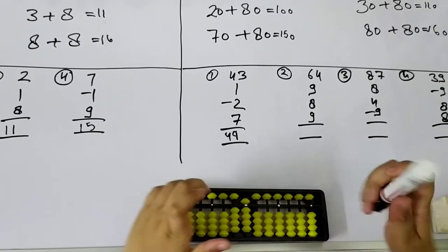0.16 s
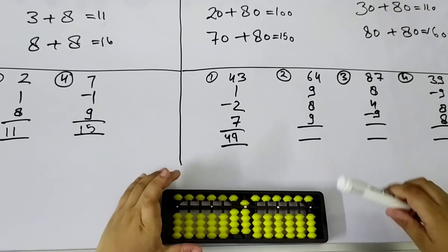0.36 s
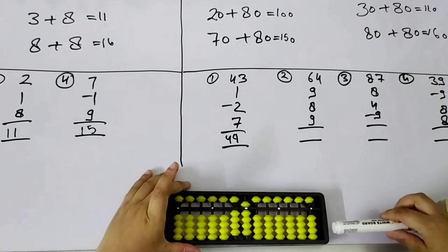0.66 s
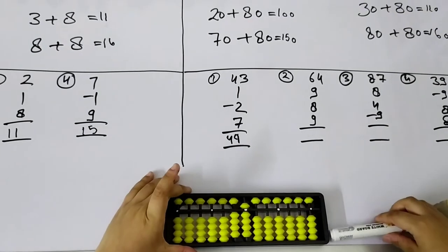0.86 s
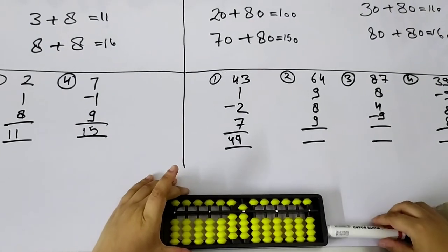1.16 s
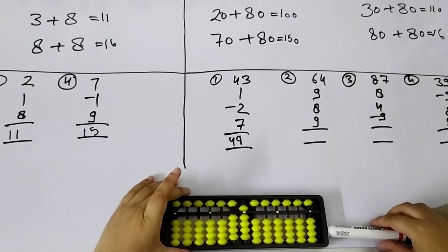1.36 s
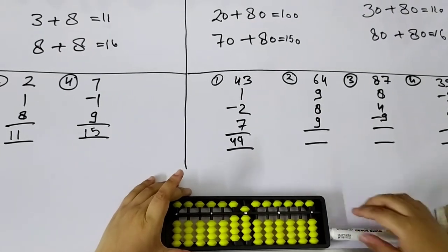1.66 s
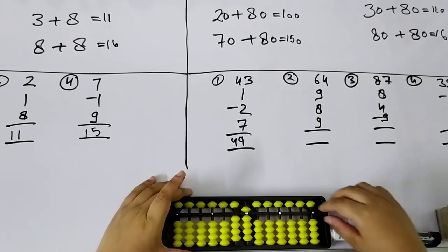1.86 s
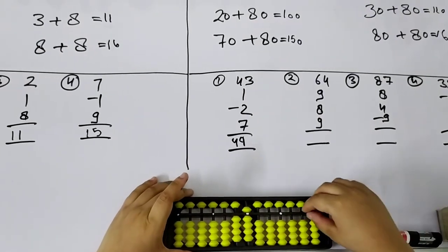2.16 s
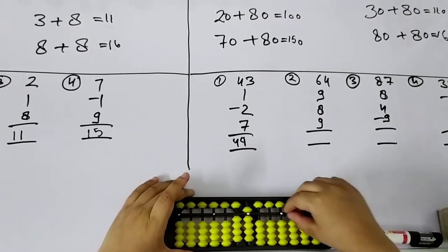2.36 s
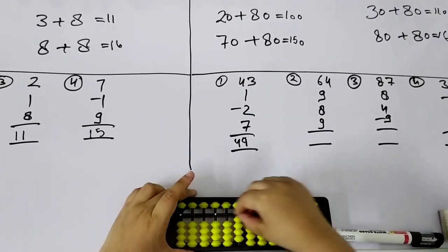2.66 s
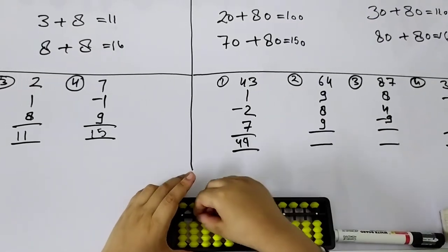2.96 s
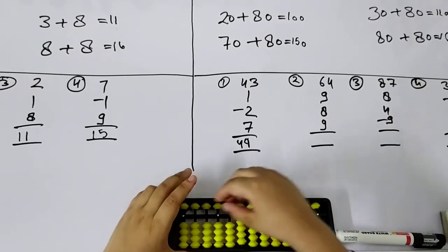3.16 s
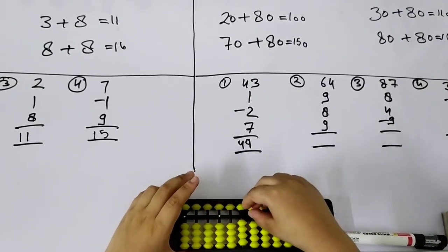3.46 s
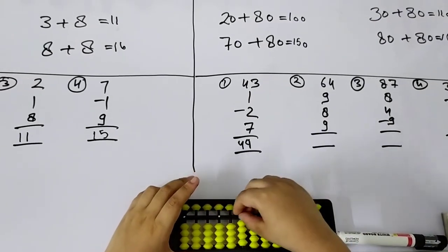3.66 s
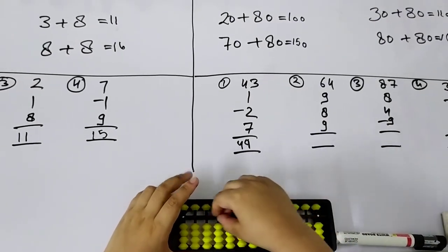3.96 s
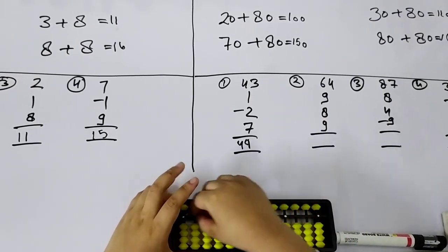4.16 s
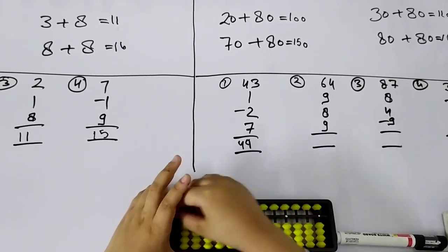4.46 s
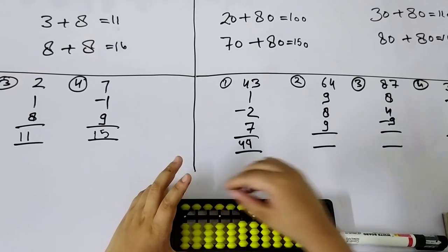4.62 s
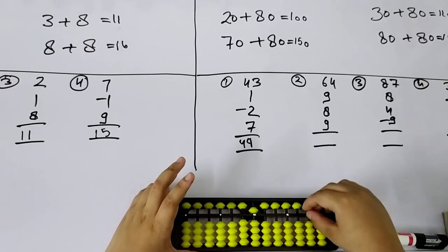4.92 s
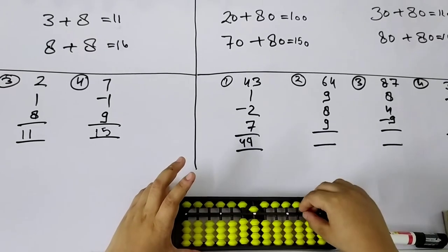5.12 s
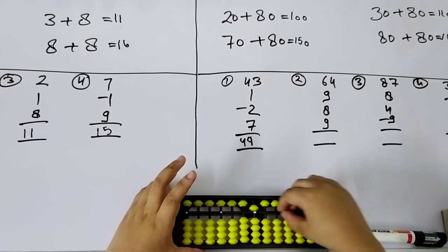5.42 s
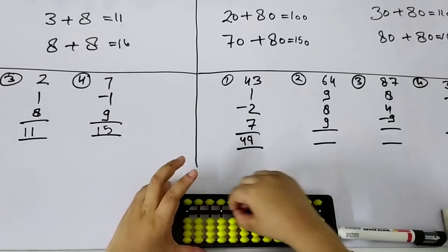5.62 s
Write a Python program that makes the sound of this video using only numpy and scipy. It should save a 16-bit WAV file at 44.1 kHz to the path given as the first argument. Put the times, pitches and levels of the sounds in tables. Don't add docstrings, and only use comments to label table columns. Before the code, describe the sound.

Quiet room: small pen taps, faint finger rubbing on plastic beads, one loud bright bead clack, soft nudges, then a weaker burst of clacks.

```python
import sys
import numpy as np
from scipy import signal
from scipy.io import wavfile

SR = 44100
rng = np.random.default_rng(int(sys.argv[2]) if len(sys.argv) > 2 else 0)


def unload_wav(signal):
    wavfile.write(
        sys.argv[1],
        SR,
        np.round(np.clip(np.atleast_2d(signal).T, -1, 1) * 32767).astype(np.int16),
    )


def gain_from_db(level_db):
    decades = np.asarray(level_db, float) / 20
    return 10 ** decades


N = 255193
PATHS = 3

# [t/s, bead level/dB, frame level/dB, left-right/dB, contact spread/ms]
BEAD_CLACKS = [(.1226, -51, -67, 11, 0.89), (.1451, -46, -64, 18, 4), (.324, -50, -73, 4, 0.83),
               (0.3292, -38.5, -48, -5.5, 0.52), (2.62, -29, -30.5, 4.5, 1.1), (2.622, -38, -36, 7, 2.5),
               (2.655, -27, -32, -1, 2.6), (2.6649, -8, -6.5, 1, 1.3), (2.6662, -16, -23, -11, 1.53),
               (2.6735, -25, -22, -5, 0.58), (2.675, -20.5, -20, -3, 1.7), (3.083, -55, -77, 7, 1.3),
               (5.4675, -38.5, -73, -7, 1.91), (5.5161, -45.5, -51, -2, .8), (5.5614, -39, -26.5, -3, 1.8),
               (5.563, -21.5, -30.5, 4, 2.3), (5.583, -20.5, -15, -3, 0.86), (5.5845, -21, -30, 7, 2.3),
               (5.5875, -38, -27, 10, 2.6), (5.6583, -18.5, -18.5, -2.5, 1.5),
               (5.6598, -20.5, -23, -7.5, 1.47), (5.661, -39, -40, 3, 1.3)]
# [f/Hz, width/Hz, level/dB]
BEAD_MODES = [(8580, 500, -0.5), (9570, 490, 13), (10300, 630, 2), (10700, 590, -5.5), (12000, 650, -6),
              (12810, 600, -9), (13300, 1000, -11), (15000, 900, -19)]
# [f/Hz, width/Hz, level/dB]
FRAME_MODES = [(2970, 280, -8), (3660, 162, -7), (4300, 620, -11.5), (4547, 570, -9), (5250, 308.5, 5.5),
               (6000, 670, 0), (6500, 600, 8.5), (7720, 450, 8)]
# [f/Hz, width/Hz, level/dB]
BOARD_MODES = [(290.5, 140, -9), (376.3, 490, -6), (502.7, 24, -7), (820, 130, -1.5), (1230, 860, 8.5),
               (1397, 640, -7.5)]
# [f/Hz, left-right/dB]
PORT_COLOUR = [(3000, 1.5), (7500, 0), (8600, -5), (9600, -17), (10700, 3.5), (12000, 10.5), (16000, 1.5)]


def at_hz(points, hz, column=1):
    points = np.array(points)
    return np.interp(np.log(hz), np.log(points[:, 0]), points[:, column])


def rms_one(x):
    return x / np.sqrt(np.mean(x ** 2) + 1e-20)


def ring(x, hz, width_hz):
    r, w = np.exp(-np.pi * width_hz / SR), 2 * np.pi * hz / SR
    return signal.lfilter([0, np.sin(w)], [1, -2 * r * np.cos(w), r * r], x + 1e-18)


def radiate(x, body):
    edges = [.75 * body[0][0], min(1.4 * body[-1][0], 17000)]
    return signal.sosfilt(signal.butter(3, edges, "band", fs=SR, output="sos"), x)


def bump(s, length):
    return np.exp(-4 * ((np.arange(N) / SR - s) / length) ** 2)


def plateaus(rows):
    t, fade_s = np.arange(N) / SR, 0.21
    return sum(db * np.clip(np.minimum(t - start, end - t) / fade_s + .5, 0, 1) for start, end, db in rows)


def bands(length):
    edges = 18 * 2 ** np.arange(0, 10, 1 / 3)
    white = rng.standard_normal((2, 2, length))
    for k, (low, high) in enumerate(zip(edges, edges[1:])):
        band = signal.butter(2, [low, high], "band", fs=SR, output="sos")
        yield np.sqrt(low * high), signal.sosfilt(band, white[k % 2])


def alike(likeness, hz, mid, side):
    share = np.clip(at_hz(likeness, hz), 0, 1)
    return np.sqrt(1 + share) * mid + np.sqrt(1 - share) * side * np.array([[1], [-1]])


def strikes(table, bodies, spread_db, third_db=0, follows=0, size=3072, send_db=0):
    port_lag_s = .00015
    swell_skew = .62
    blur = 2.2
    room_shares_colour = 0.3
    direct, sent = np.zeros((2, N + size)), np.zeros((PATHS, 2, N + size))
    moments, sizes = rng.random((len(table), 10)), rng.standard_normal((len(table), 10))
    colour = spread_db * rng.standard_normal((len(table), 3, 8, 2))
    click, half = np.eye(1, size)[0], np.array([[.5], [-.5]])

    def mode(x, m, hz, width_hz, db):
        return (-1) ** m * gain_from_db(db) * rms_one(ring(x, hz, width_hz)) / np.sqrt(width_hz)

    blurred = []
    for body in bodies:
        modes = [mode(click, m, hz, blur * width_hz, db) * np.sqrt(blur)
                 for m, (hz, width_hz, db) in enumerate(body)]
        blurred.append(radiate(np.array(modes), body))

    for k, (s, first_db, second_db, pan_db, spread_ms) in enumerate(table):
        levels_db = first_db, second_db, first_db + third_db + follows * (second_db - first_db)
        contact, now = np.zeros((2, size)), slice(round(s * SR), round(s * SR) + size)
        for side, lag in enumerate((0, port_lag_s * SR)):
            at = moments[k] * spread_ms * SR / 1000 + lag
            np.add.at(contact[side], at.astype(int), sizes[k] * np.sin(np.pi * moments[k] ** swell_skew))
        for b, body in enumerate(bodies):
            modes = [mode(contact, m, hz, width_hz, db + colour[k, b, m][:, None] + half * at_hz(PORT_COLOUR, hz))
                     for m, (hz, width_hz, db) in enumerate(body)]
            direct[:, now] += gain_from_db(levels_db[b] - 4.5 + half * pan_db) * radiate(sum(modes), body)
            wall_colour = gain_from_db(room_shares_colour * colour[k, b, :len(body), 0])
            sent[k % PATHS, :, now] += gain_from_db(levels_db[b] - 5.0) * (wall_colour @ blurred[b])
    return direct[:, :N], gain_from_db(send_db) * sent[:, :, :N]


def bead_clacks():
    return strikes(BEAD_CLACKS, (BEAD_MODES, FRAME_MODES), spread_db=5.0, size=1024)


def rods_ringing():
    # [f/Hz, level/dB, t60/s]
    rod_decays = [(3671, -5.5, 0.25), (4450, -6, 0.15), (5103, -9, 0.39), (6406, -12, 0.095),
                  (7079, -14, 2.7), (7967, -20.5, 2.0), (8570, -9, 0.35), (8899, -4, 0.2), (9507, -11, 1.0),
                  (10410, 0, 0.15), (10670, -25, 0.31), (10980, -19, 0.78)]
    s, _, frame_db, *_ = np.transpose(BEAD_CLACKS)
    top_db, out = max(db for _, db, _ in rod_decays), 0
    for hz, db, t60 in rod_decays:
        strength_db = frame_db - 42 + db - top_db + 3.0 * rng.standard_normal((len(s), 2)).T
        clicks = np.zeros((2, N))
        clicks[:, (s * SR).astype(int)] = gain_from_db(strength_db) * rng.choice([-1, 1], (len(s), 2)).T
        out = out + ring(clicks, hz, np.log(1000) / np.pi / np.clip(t60, .05, .5))
    return out


def frame_knocks():
    # [t/s, foot level/dB, board level/dB, left-right/dB, contact spread/ms]
    knocks = [
        (.329, -58, -64, -2, 2.3),
        (2.621, -38, -49, -2.5, 3.37),
        (2.6665, -25.5, -34.5, -5, 2.3),
        (2.6745, -50, -43, 1.5, 2),
        (5.5625, -39.5, -58, -1, 3.4),
        (5.584, -40, -46, 1, 1.6),
        (5.6595, -40, -42, 4, 2.73),
    ]
    # [f/Hz, width/Hz, level/dB]
    foot_modes = [(1440, 300, -10), (1780, 300, 2), (1880, 290, 2), (2250, 348.4, 1.5), (2820, 680, -1.5)]
    return strikes(knocks, (foot_modes, BOARD_MODES), spread_db=6.5, send_db=5.5)


def fingertip_nudges():
    # [t/s, rod level/dB, board level/dB, left-right/dB, contact spread/ms]
    nudges = [(2.30, -58, -61.5, 2, 0.77), (3.7404, -45.5, -84, -6.5, 2.9), (3.901, -37.5, -53.5, -5, 1.9),
              (4.151, -62, -55.5, 1, 4.5), (4.245, -56, -67, 4.5, 2.7), (4.30, -58, -66.5, 7.5, 4.7),
              (4.37, -56, -76, 1, 5.4), (5.1547, -46.5, -60, 2.5, 2.01)]
    # [f/Hz, width/Hz, level/dB]
    rod_modes = [(2491, 900, 0), (3410, 800, 3), (4300, 380, 5.5), (5560, 700, 2.5), (6570, 600, 1.5),
                 (7814, 770, 0)]
    bodies = rod_modes, BOARD_MODES, BEAD_MODES
    return strikes(nudges, bodies, third_db=-13.5, spread_db=3.5, send_db=5.5)


def pen_laid_down():
    # [t/s, cap level/dB, thud level/dB, left-right/dB, contact spread/ms]
    taps = [
        (.7716, -52.5, -72.5, 6, 3.4),
        (.8742, -25, -33, 1.5, 2.27),
        (.8775, -48, -37.5, 1, 2.06),
        (.883, -42, -41, -16, 2.95),
        (.9585, -35.5, -43, -5, 3.4),
        (.9675, -41.5, -70, -2, 2.4),
    ]
    end_touches = [
        (.818, -33.5, -37.5, -4.5, 2.4),
        (1.20, -61, -51.5, -8, 0.98),
        (1.230, -68, -44, -1, 3.4),
        (1.4745, -52.5, -46, -5, 2),
    ]
    # [f/Hz, width/Hz, level/dB]
    cap_modes = [(3680, 1080, 7), (4900, 1260, 9.5), (6040, 315, 1.5), (6630, 2200, 7.5), (9100, 590, 7),
                 (9440, 1060, 8.5), (12300, 1900, 0)]
    thud_modes = [(157, 150, -11), (270, 46, -11.5), (378.3, 10.6, -11.5), (538, 20.7, -8.5),
                  (655, 85, -1.5), (826, 106, -0.5), (997, 88, -0.5), (1230, 510, 6.5)]
    barrel_modes = [(1570, 190, 5.9), (2034, 276, 17.7), (2205, 180, 16.6), (2580, 480, 11.3),
                    (3170, 320, 2.5)]
    bodies = cap_modes, thud_modes, barrel_modes
    free, free_sent = strikes(taps, bodies, third_db=-6.5, spread_db=1.0, follows=.6, send_db=5.5)
    held, held_sent = strikes(end_touches, bodies, third_db=-13, spread_db=1.0, follows=.6, send_db=4.5)
    return free + held, free_sent + held_sent


def rubbing():
    # [middle t/s, length/s, bead level/dB, board pressure/dB]
    rubs = [(0.174, 0.027, -63, -109), (2.274, 0.043, -66, -93), (2.3, 0.012, -89, -63),
            (2.392, 0.03, -60, -71), (2.471, 0.032, -60.5, -69.5), (2.54, 0.039, -62, -70.5),
            (2.599, 0.038, -64, -85), (3.397, 0.071, -78.5, -72), (4.119, 0.037, -67.5, -76),
            (4.16, 0.017, -67.5, -67.5), (4.227, 0.067, -67, -71), (4.312, 0.07, -66.5, -65),
            (4.382, 0.039, -74.5, -58.5), (4.446, 0.016, -67.5, -77.5), (5.108, 0.021, -74, -72.5),
            (5.327, 0.093, -69.5, -70.5), (5.42, 0.03, -62, -88), (5.55, 0.18, -64.5, -88)]
    # [f/Hz, width/Hz, level/dB]
    skin_modes = [(4200, 400, -16.5), (6400, 520, 1.5), (8070, 170, -3), (9700, 280, 8), (12500, 400, -5)]
    heights = gain_from_db(5.0 * np.minimum(rng.exponential(1, (2, N)), 4))
    present = rng.random((2, N)) < 6000 / SR
    grains = heights * rng.choice([-1, 1], (2, N)) * present
    levels_db = [(db, db - 5 + 0.46 * (board_db - db), board_db) for *_, db, board_db in rubs]
    strokes = gain_from_db(np.transpose(levels_db)) @ [bump(s, length) for s, length, *_ in rubs]
    out = 0
    for stroke, body in zip(strokes, (skin_modes, FRAME_MODES, BOARD_MODES)):
        modes = sum(gain_from_db(db) * ring(grains, hz, 2.2 * width_hz) for hz, width_hz, db in body)
        out = out + stroke * rms_one(radiate(modes, body))
    return out


def singing():
    # [middle t/s, length/s, f/Hz, level/dB]
    songs = [(.773, 0.0036, 10400, -52.5), (1.156, .006, 9400, -70), (1.378, 0.028, 3580, -74),
             (2.27, .03, 9700, -71), (2.29, .01, 7500, -66), (2.366, .02, 9700, -67),
             (2.395, .02, 7000, -66), (2.397, .025, 12200, -66), (2.475, .03, 8000, -68),
             (2.47, 0.028, 12300, -72), (2.53, .025, 5700, -69.5), (2.58, .015, 9700, -69),
             (3.59, 0.072, 9930, -78), (3.712, .04, 9600, -72), (3.85, .05, 9900, -73.5),
             (4.161, .035, 4500, -73), (4.214, .02, 6500, -71.5), (4.252, .04, 4370, -72.5),
             (4.316, 0.053, 6600, -67), (4.328, 0.055, 8770, -66.5), (4.39, 0.1, 2004, -69),
             (4.441, .035, 6700, -69.5), (5.326, .04, 12350, -74), (5.43, .03, 7000, -69)]
    sharpness = 18
    grains = rng.standard_normal((2, N)) * gain_from_db(3.0 * rng.standard_normal((2, N)))
    out = 0
    for s, length, hz, db in songs:
        tone = ring(ring(grains, hz, hz / sharpness), hz, 3.0 * hz / sharpness)
        out = out + gain_from_db(db) * bump(s, length) * rms_one(tone)
    return out


def palms():
    # [middle t/s, length/s, level/dB]
    presses = [
        (0.982, 0.11, -54),
        (1.243, 0.066, -60.5),
        (2.324, 0.09, -68.5),
        (2.738, 0.15, -57.5),
        (2.918, 0.064, -76),
        (5.65, 0.13, -65),
    ]
    # [f/Hz, width/Hz, level/dB]
    table_modes = [(130, 79, -5.5), (204, 11.1, -8), (278, 8.7, 1), (360, 31, 2.5)]
    push = rng.standard_normal(N) * sum(gain_from_db(db) * bump(s, length) for s, length, db in presses)
    modes = sum(gain_from_db(db) * ring(push, hz, width_hz) * np.sqrt(4 * np.pi * width_hz / SR)
                for hz, width_hz, db in table_modes)
    return radiate(modes, table_modes)


def room(x):
    # [f/Hz, level/dB, t60/s]
    tail_decays = [(147, 6, 0.25), (402, 0, 0.46), (1225, 0.5, 0.39), (2770, 3.5, 0.44), (5700, -7, 0.3965),
                   (9300, -3, 0.37), (11750, -4, .33), (16200, -14, 0.3)]
    # [f/Hz, share]
    tail_likeness = [(120, .9), (300, 0.98), (600, 0.93), (1200, .2), (2500, .03)]
    t, half = np.arange(SR // 2) / SR, np.array([[.5], [-.5]])
    tail = 0
    for hz, band in bands(PATHS * len(t)):
        decay_db = at_hz(tail_decays, hz) - 60 * t / at_hz(tail_decays, hz, column=2)
        noise = alike(tail_likeness, hz, *band).reshape(2, PATHS, -1).swapaxes(0, 1)
        tail = tail + gain_from_db(decay_db + at_hz(PORT_COLOUR, hz) * half) * noise
    tail = gain_from_db(-31.5) * tail * np.clip((t - 0.00041) / 0.0044, 0, 1)
    return signal.fftconvolve(x, tail, axes=2).sum(axis=0)[:, :N]


def far_tones():
    # [f/Hz, width/Hz, level/dB]
    drone_lines = [(99.1, 3.9, -68), (288.3, 24, -71), (389, 20, -76.5)]
    # [start t/s, end t/s, rise/dB]
    motor_runs = [
        (.1, 1.05, 14),
        (1.2, 1.8, 13),
        (2.9, 3.2, 13),
        (5.4, 6.0, 11),
    ]
    # [middle t/s, length/s, f/Hz, level/dB]
    street_pips = [
        (2.56, 0.068, 1155, -66),
        (4.92, 0.11, 624, -70),
        (5.186, 0.066, 615, -68),
    ]

    def waver(hz, width_hz):
        return rms_one(ring(rng.standard_normal(N), hz, width_hz))

    drones = sum(gain_from_db(db) * waver(hz, width_hz) for hz, width_hz, db in drone_lines)
    motor = gain_from_db(-75.5 + plateaus(motor_runs)) * waver(74, 3.3)
    pips = sum(gain_from_db(db) * bump(s, length) * np.sin(2 * np.pi * hz * np.arange(N) / SR)
               for s, length, hz, db in street_pips)
    return drones + motor + pips


def background():
    # [f/Hz, density/dB per Hz]
    noise_spectrum = [(18, -3), (25, -11.5), (45, -11.5), (80, -10.5), (125, -17.5), (170, -12), (290, -21),
                      (620, -25.5),
                      (1050, -27), (1700, -33.5), (2400, -31.5), (4660, -42.5), (10500, -37), (16500, -57)]
    # [f/Hz, share]
    noise_likeness = [(30, 0), (60, 0.588), (130, 0.9), (290, 0.05), (640, 0.4), (1410, 0), (3100, 0),
                      (15000, 0)]
    # [start t/s, end t/s, hum rise/dB]
    traffic_swells = [
        (.1, 1.7, 0),
        (2.7, 2.89, 8.5),
        (3.6, 3.9, 1.5),
        (5.45, 9.2, 5),
    ]
    # [start t/s, end t/s, treble rise/dB]
    hand_moves = [
        (-.2, .5, 9.5),
        (2.05, 2.75, 6),
        (3.6, 4.5, 9),
        (5.45, 6.0, 14),
    ]
    hum_db, rustle_db = 8 + plateaus(traffic_swells), -1 + plateaus(hand_moves)
    out = 0
    for hz, band in bands(N):
        high = np.clip(np.log2(hz / 1400) / 5.04, 0, 1)
        level_db = at_hz(noise_spectrum, hz) - 42.0 + high * rustle_db + (1 - high) * hum_db
        out = out + gain_from_db(level_db) * alike(noise_likeness, hz, *band)
    return out


def sway():
    return gain_from_db(-59) * rms_one(ring(rng.standard_normal((2, N)), 12, 9.0))


def scene():
    clacks, clacks_sent = bead_clacks()
    knocks, knocks_sent = frame_knocks()
    nudges, nudges_sent = fingertip_nudges()
    pen, pen_sent = pen_laid_down()
    rub = rubbing()
    wet = room(clacks_sent + knocks_sent + nudges_sent + pen_sent + gain_from_db(-7.0) * rub)
    abacus = clacks + rods_ringing() + knocks + nudges + rub + singing()
    return abacus + pen + palms() + wet + far_tones() + background() + sway()


def roll_off(x):
    return signal.sosfilt(signal.butter(12, 16520, fs=SR, output="sos"), x)


def record(dry):
    return roll_off(dry)


dry = scene()
out = record(dry)
unload_wav(out)
```